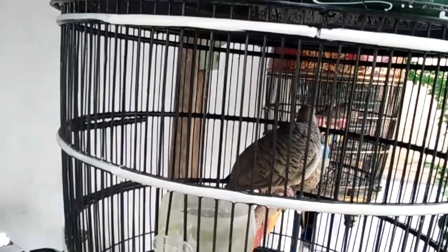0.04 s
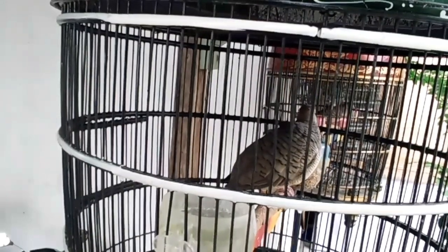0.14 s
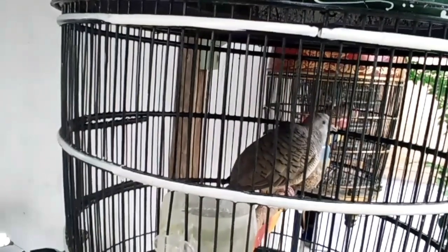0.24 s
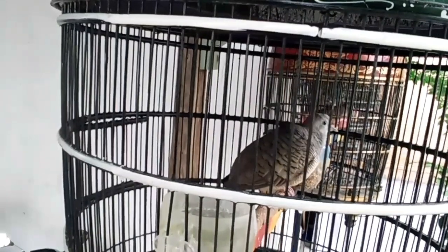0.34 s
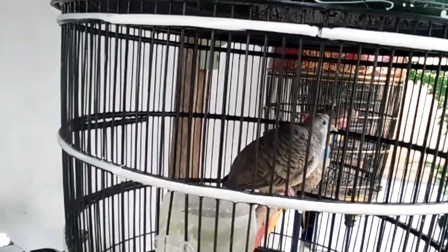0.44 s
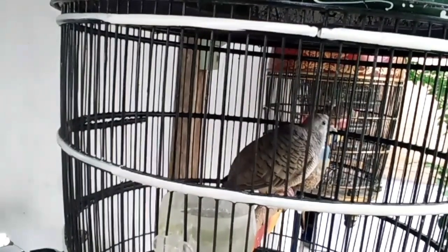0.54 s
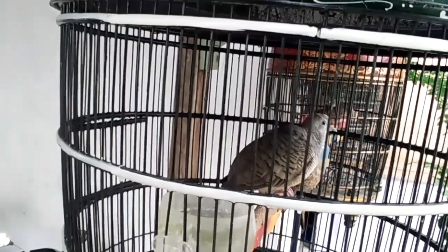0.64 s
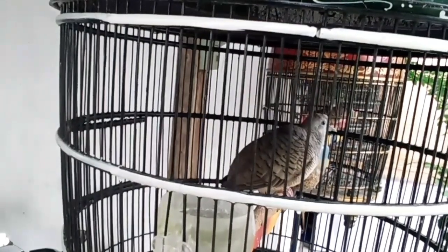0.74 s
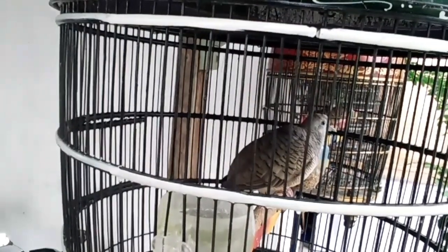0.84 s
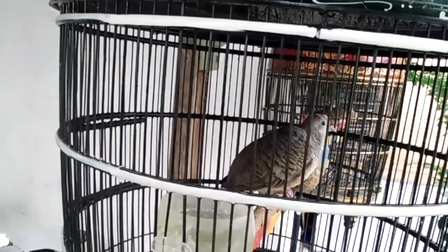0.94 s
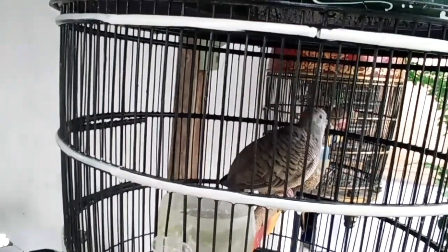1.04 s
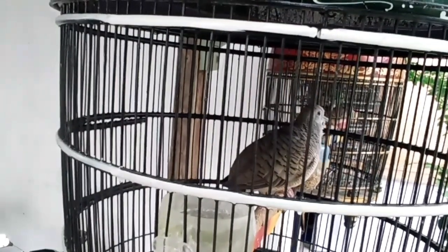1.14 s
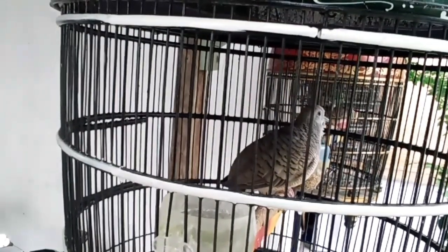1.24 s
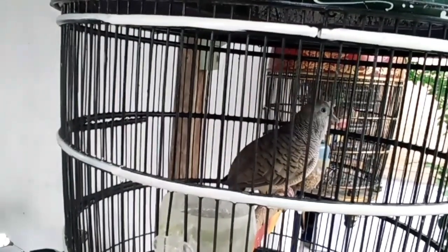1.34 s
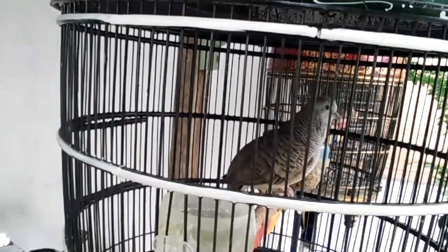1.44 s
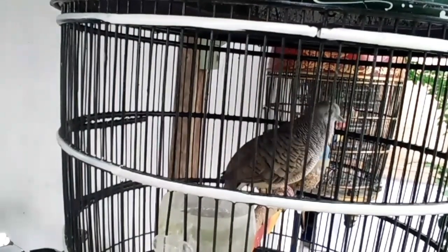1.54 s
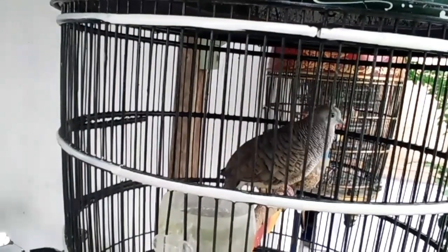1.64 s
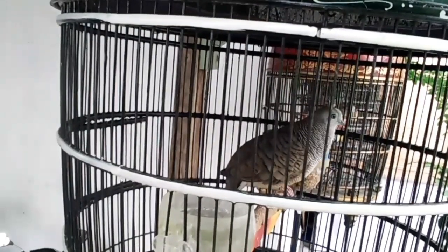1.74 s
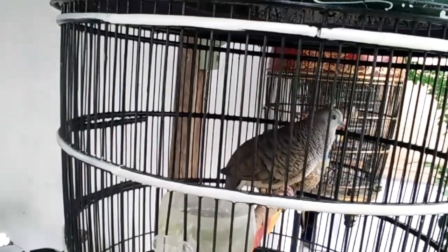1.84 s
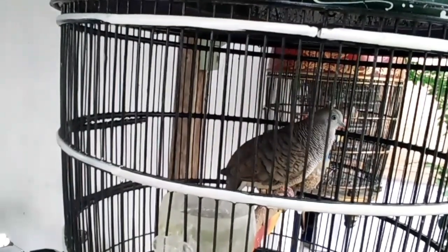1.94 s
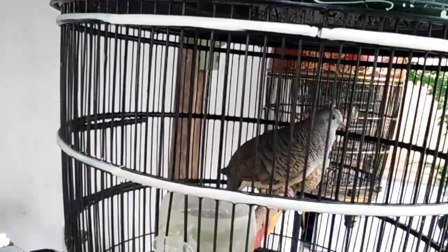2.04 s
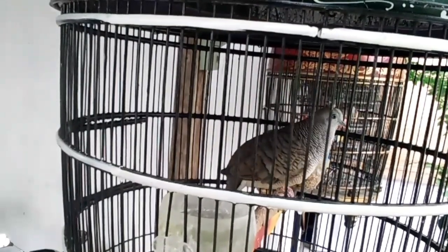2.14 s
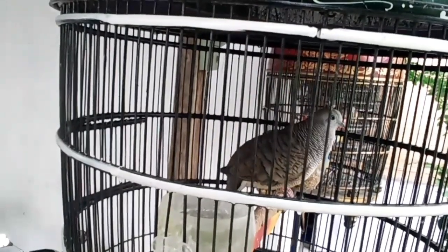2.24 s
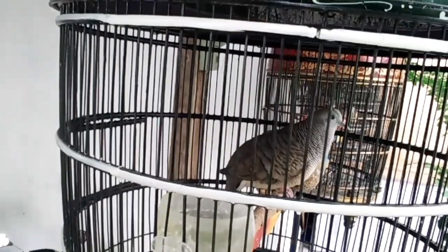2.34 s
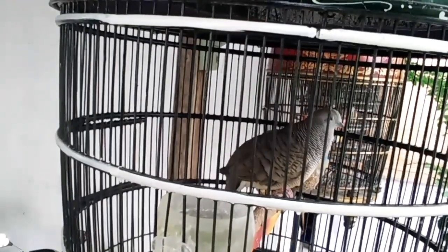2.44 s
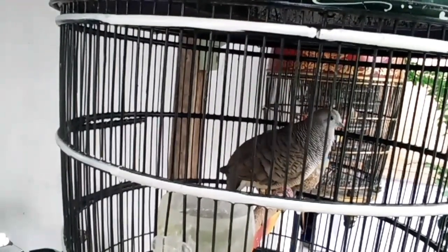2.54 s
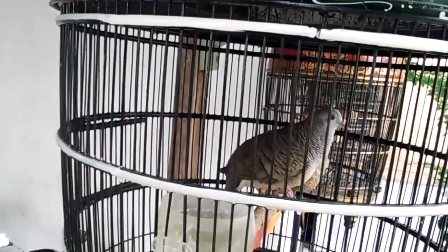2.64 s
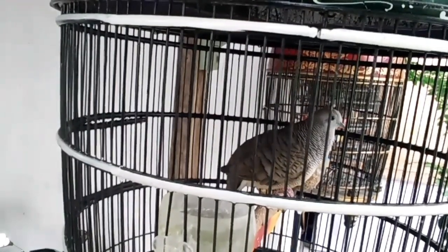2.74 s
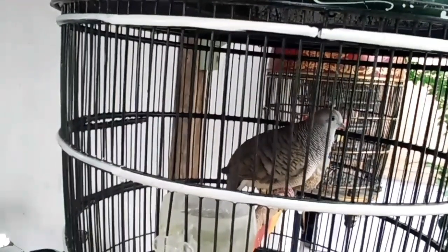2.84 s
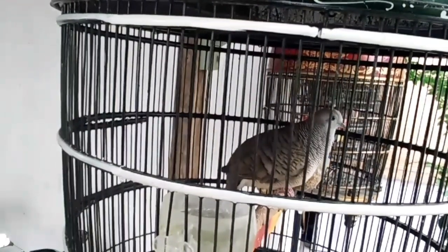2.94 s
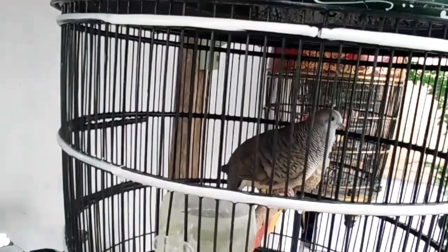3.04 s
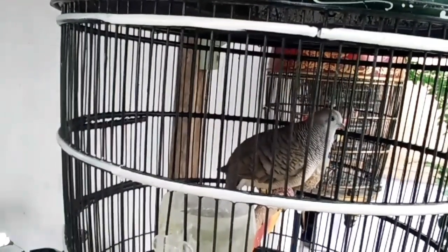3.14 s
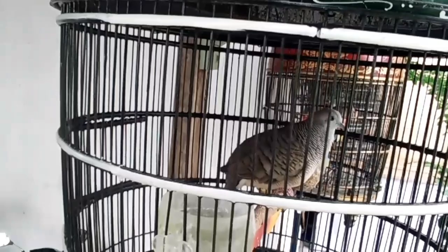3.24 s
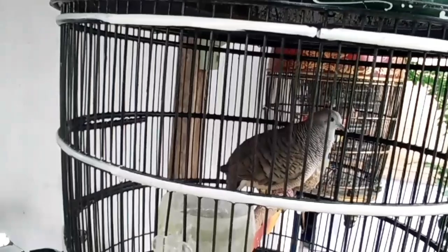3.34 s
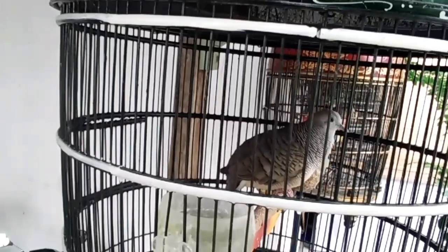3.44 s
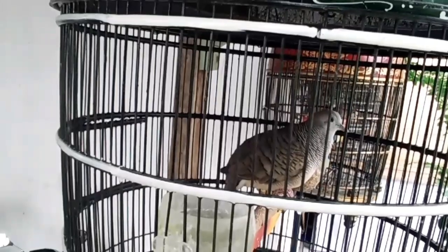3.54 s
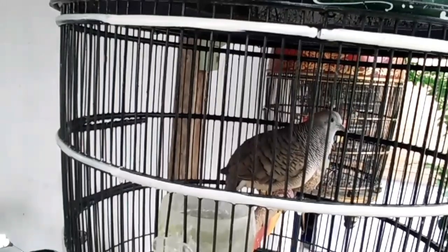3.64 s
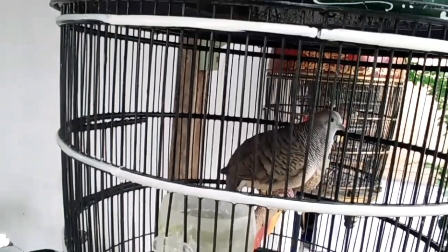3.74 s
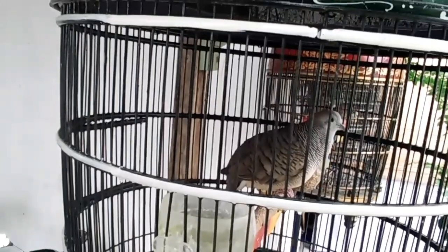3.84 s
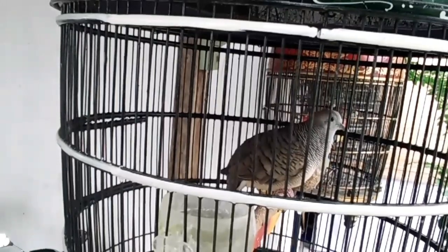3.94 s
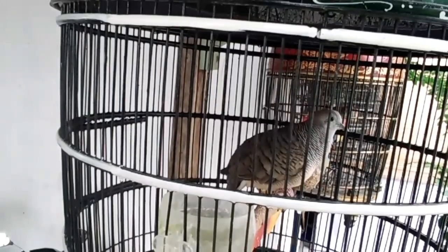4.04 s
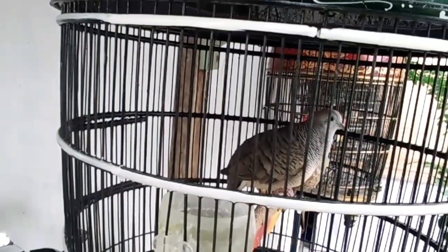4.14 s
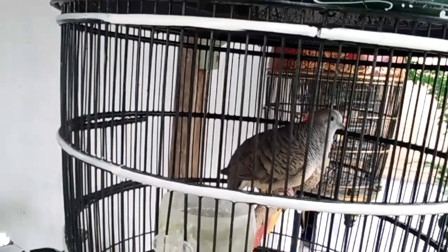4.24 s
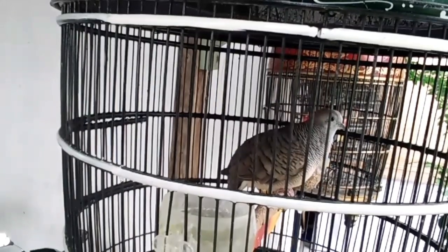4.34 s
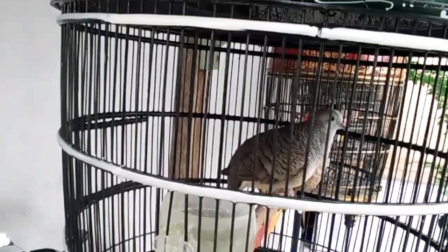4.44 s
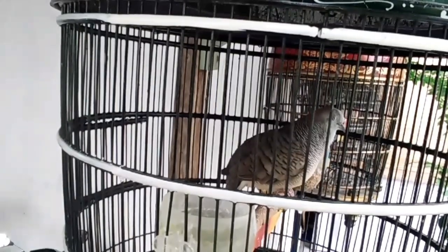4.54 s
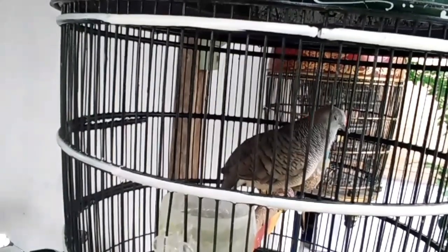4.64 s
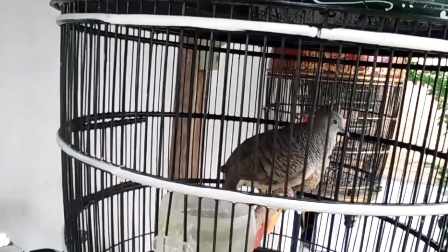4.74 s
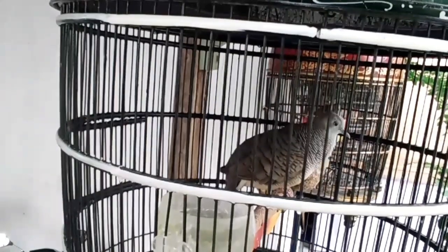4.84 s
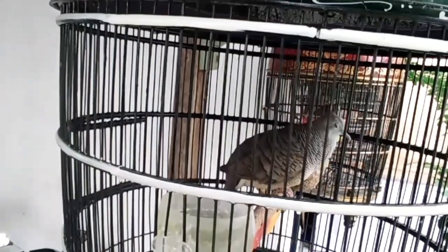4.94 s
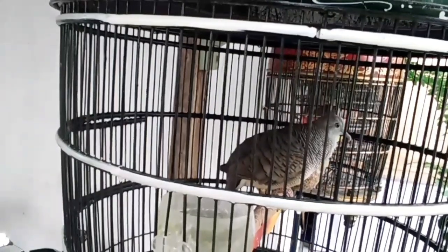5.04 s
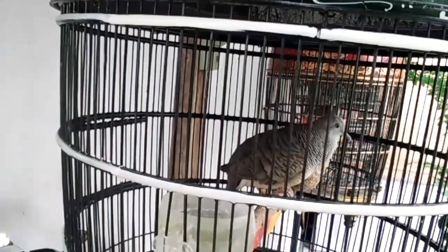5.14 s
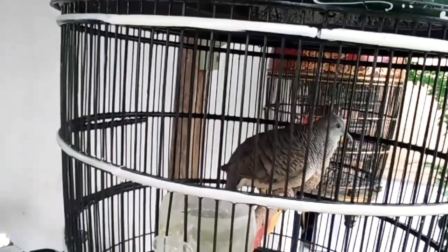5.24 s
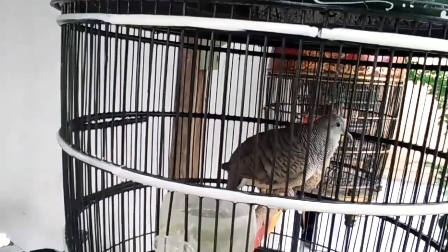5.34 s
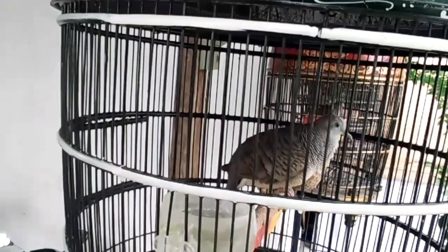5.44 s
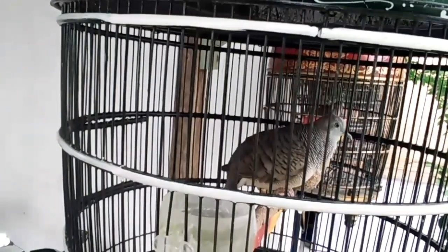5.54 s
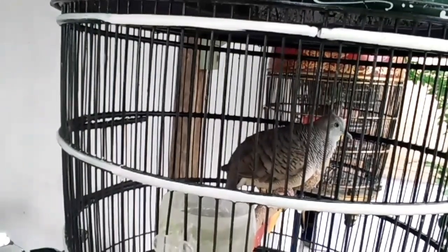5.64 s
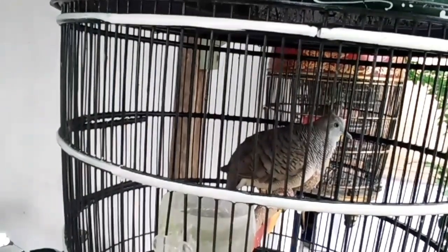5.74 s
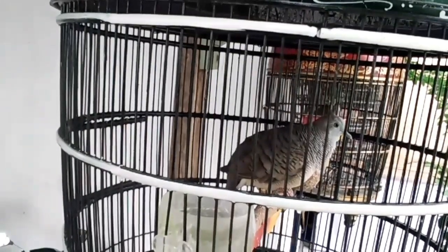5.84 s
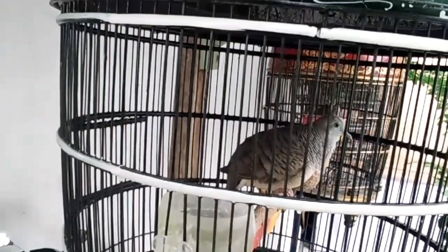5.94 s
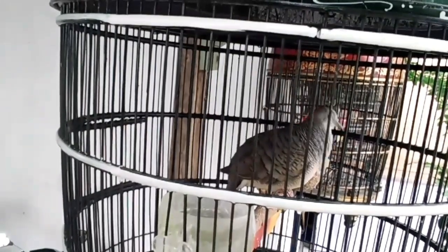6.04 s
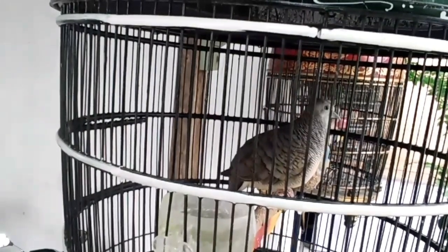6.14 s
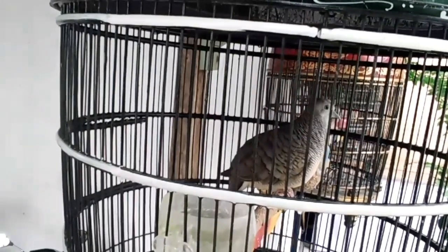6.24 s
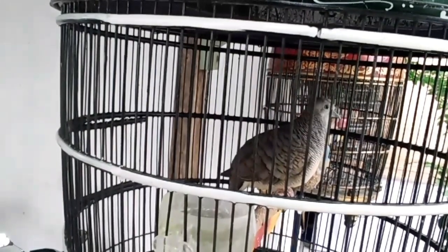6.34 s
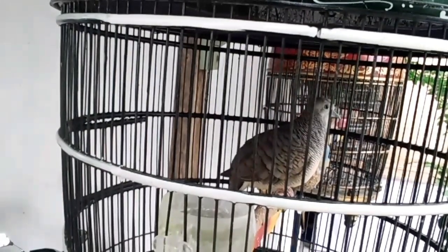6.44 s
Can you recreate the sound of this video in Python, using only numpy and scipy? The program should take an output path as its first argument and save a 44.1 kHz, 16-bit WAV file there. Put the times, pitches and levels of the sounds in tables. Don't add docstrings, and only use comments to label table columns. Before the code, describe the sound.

A quiet walled yard, heard through a close phone-like microphone with faint hum and soft low wind puffs. Around 0.4 and 0.65 s two small, harsh falling bird scolds rasp faintly; from 1.0 to 1.65 s distant doves coo in a blurred, echoing cluster. At 1.73 s the near dove starts, far louder: a round, hollow note, two quick stuttered ones, then steady coos about a tenth of a second long, roughly four per second, until 3.54 s. Each begins with a tiny croak scooping up into a nearly pure mid-high whistle around 1200 Hz, with wall slaps and a short tail. A faint buzz sits near 2.0 s. From 3.2 s a neighbouring dove whistles softly, slightly higher, continuing through the gap. The near dove returns at 4.85 s with a shorter run, ending at 5.53 s. Faint coos and warbles remain, small distant notes rising near 6.4 s.

```python
import sys
import numpy as np
from scipy import signal
from scipy.fft import rfft, irfft, next_fast_len
from scipy.io import wavfile
from scipy.ndimage import uniform_filter1d

SR = 44100
rng = np.random.default_rng(int(sys.argv[2]) if len(sys.argv) > 2 else 0)


def invert_db(level):
    return 10 ** (np.asarray(level, dtype=float) / 20)


def master_out(mix):
    frames = np.transpose(np.atleast_2d(mix))
    ceiling = np.clip(frames, -1, 1)
    pcm = np.round(ceiling * 32767).astype(np.int16)
    wavfile.write(sys.argv[1], SR, pcm)


N = 286870

# (delay [s], level [dB])
WALL_SLAPS = [
    (0.028, 1.2),
    (0.035, -4),
    (.044, -4),
    (.056, -3.5),
    (0.065, -7.5),
]


def dove():
    whistle, spread = whistles()
    scoop, croak = run_ups()
    run_up = scoop + invert_db(-6.5) * croak
    out = whistle + scoop + croak
    diffuse = invert_db(-18.5) * spread + invert_db(-7) * run_up
    early = invert_db(-19.5) * spread + invert_db(-9) * run_up
    add(out, .022, signal.oaconvolve(diffuse, tail(0.74)))
    for delay, db in WALL_SLAPS:
        add(out, delay, invert_db(db) * early[:N - round(delay * SR)])
    return out


# (start [s], end [s], level [dB], top pitch [Hz], fading over the note [dB])
WHISTLES = [(1.733, 1.795, -19, 1210, 0.5), (1.797, 1.806, -29, 1149, 2), (1.814, 1.853, -23.5, 1182, -1.5),
            (1.942, 1.974, -24.5, 1177, -7), (2.06, 2.163, -21.5, 1210, -2), (2.307, 2.418, -22, 1207, -2),
            (2.565, 2.683, -23, 1203, -0.5), (2.837, 2.961, -23.5, 1202, -0.5),
            (3.125, 3.251, -24, 1201, 0.5), (3.414, 3.543, -24, 1194, 0), (4.845, 4.916, -22.5, 1198, 1),
            (4.914, 4.932, -31.5, 1127, 6), (4.928, 4.965, -24, 1175, 1), (5.051, 5.08, -25.5, 1163, -1.5),
            (5.163, 5.282, -24.5, 1179, -0.5), (5.419, 5.529, -25.5, 1187, 1.5)]
BEAK_OPENING = [0.5, -3.5, 4, 0.5, 1.5, 0, 0, -1, -1, -2, 0, -3.5, 5, 0, 3, -3.5]
# (frequency [Hz], level under the first partial [dB])
BEAK_RESPONSE = [(2200, -53), (2450, -55), (3500, -74), (5600, -75), (5750, -55.5), (6050, -60),
                 (6300, -69), (6780, -69), (6960, -53.5), (7250, -54.5), (8200, -69), (10800, -76),
                 (11600, -64.5), (12050, -64.5), (12500, -81), (13500, -81.5)]
# (frequency [Hz], level per Hz [dB])
BREATH_COLOUR = [(600, -27.5), (1300, 2), (2400, -12), (4400, -29.5), (7500, -18.5), (13600, -23.5),
                 (15000, -38.5)]


def whistles():
    out, spread = np.zeros((2, N))
    breath = coloured(BREATH_COLOUR, N)
    last_end = 0
    for (start, end, db, top_hz, fade_db), open_db in zip(WHISTLES, BEAK_OPENING):
        t = np.arange(0, end - start + .0105, 1 / SR)
        share = t / t[-1]
        opening = start - last_end > 1
        brief = end - start < .06
        last_end = end

        sag_hz = 33 if opening else 54 if brief else 78
        arch = np.exp(-t / .0105) + 1.1 * share ** 3.2
        throb = -np.cos(4 * np.pi * (share - .027))
        hz = top_hz + 3 - sag_hz * arch - 45 * np.exp(-t / 0.0067)
        hz += opening * 9 * (throb + 2 * share - 1)
        hz -= 110 * np.exp((t - t[-1]) / .006)

        if opening:
            swell_db = 0.15 + 2 * throb
        else:
            swell_db = 1.73 - 17.5 * (share - .45) ** 2
            if not brief:
                swell_db += 2.1 * np.exp(-((share - .92) / .05) ** 2)
                swell_db -= 1.95 * np.exp(-((share - .76) / .073) ** 2)
        level = invert_db(db + swell_db + fade_db * (share - 0.46)) * edges(t, 0.0075, 0.0105)

        orders = [(1, 0.00037)]
        for k in range(2, 12):
            orders.append((k, read(BEAK_RESPONSE, k * hz) + open_db - 1.5 + 3 * wander(len(t), 0.008)))
        air = invert_db(-49.5) * breath[round(start * SR):][:len(t)]
        note = level * (stack(hz, orders) + air)
        add(out, start - .003, note)
        add(spread, start - .003, note * invert_db(5 * (share - 0.86)))
    return out, spread


# (flip to whistle [s], scoop level [dB], croak start before the flip [s])
RUN_UP_NOTES = [(1.731, -22, 0.044), (1.815, -32, 0.019), (1.944, -25, 0.03), (2.062, -24.5, 0.023),
                (2.309, -25, 0.034), (2.566, -25, 0.028), (2.838, -25, 0.028), (3.127, -25, 0.029),
                (3.415, -25.5, 0.03), (4.846, -23, 0.038), (5.054, -28, 0.028), (5.166, -28, 0.022),
                (5.421, -27, 0.029)]
# (multiple of the pitch [1], level [dB])
CROAK_PARTIALS = [(1.001, -22), (1.599, -11), (2, -2.5), (2.501, -29.5), (3, -38)]


def run_ups():
    scoops, croaks = np.zeros((2, N))
    for flip, scoop_db, early in RUN_UP_NOTES:
        t = np.arange(0, early + 0.0048, 1 / SR)
        growth_s = .0046 * early / .029
        swell = np.exp(np.minimum(t - early + 0.00075, 0) / growth_s) * edges(t, 0.023, 0.01)
        rise = np.clip((t - early + 0.0023) / (2.5 * growth_s), -1.1, .5)
        scoop = invert_db(3.0) * swell * stack(965 + 72 * rise, [(1, 0.5), (2, -41.5)])
        add(scoops, flip - early, invert_db(scoop_db) * scoop)

        share = t / early
        croak_hz = 608 * (.88 + .22 * share + .03 * wander(len(t), .003))
        croak = stack(croak_hz, CROAK_PARTIALS) * invert_db(3 * wander(len(t), .0025))
        hump = np.sin(np.pi * np.clip(share / .95, 0, 1)) ** 1.2
        add(croaks, flip - early, invert_db(scoop_db - 13.5) * croak * hump)
    return scoops, croaks


# (start [s], length [s], level [dB], pitch [Hz], overtone strength [dB])
NEIGHBOUR_NOTES = [(3.179, 0.072, -57.5, 1241, 10), (3.451, 0.13, -52, 1225, -4),
                   (3.653, 0.1, -68, 1291, 9.5), (3.792, 0.11, -56, 1341, -1),
                   (3.975, 0.11, -53.5, 1334, -4), (4.181, 0.094, -51, 1323, 1),
                   (4.397, 0.1, -49.5, 1310, 1), (4.619, 0.095, -50, 1313, 4),
                   (4.872, 0.061, -48, 1328, 3.5), (5.076, 0.055, -47.5, 1328, 2),
                   (5.14, 0.12, -59, 1265, 5.5), (5.314, 0.084, -55.5, 1285, -8.5),
                   (5.39, 0.1, -51.5, 1275, -0.5), (5.523, 0.049, -49, 1268, 2.5),
                   (5.762, 0.072, -58, 1262, 5.5), (6.08, 0.1, -58, 1191, -11.5)]
# (multiple of the pitch [1], level [dB])
NEIGHBOUR_PARTIALS = [(1, 0.35), (2, -29.5), (3, -30.5)]


def neighbour():
    tone, husk = np.zeros((2, N))
    for s, length, db, hz, lift_db in NEIGHBOUR_NOTES:
        t = np.arange(0, length, 1 / SR)
        pitch = hz * (1 - 0.044 * np.exp(-t / 0.015) + 0.012 * wander(len(t), 0.0028))
        level = invert_db(db) * edges(t, 0.022, 0.03)
        husky = [(k, d + lift_db + 5 * wander(len(t), 0.0031)) for k, d in NEIGHBOUR_PARTIALS[1:]]
        husk_pitch = pitch * (.985 + 0.011 * wander(len(t), .004))
        add(tone, s, level * stack(pitch, NEIGHBOUR_PARTIALS[:1]))
        add(husk, s, level * stack(husk_pitch, husky))
    wet = signal.oaconvolve(invert_db(-5.5) * tone + invert_db(-1.5) * husk, tail(1.1))[:N]
    slap = invert_db(-15.5) * tone + invert_db(-14) * husk
    add(wet, .065, slap[:N - round(.065 * SR)])
    return 1.32 * tone + 0.17 * husk + wet


# (start [s], length [s], level [dB], first pitch [Hz], fading [dB])
SCOLD_CALLS = [
    (0.369, 0.1, -59.5, 2550, -2.5),
    (0.654, 0.099, -54, 1890, -11),
]
# (start [s], length [s], level [dB], first pitch [Hz], fading [dB])
BUZZ_CALLS = [
    (1.69, 0.175, -72.5, 2440, 1.5),
    (2.015, 0.205, -63, 2314, -5),
    (2.91, 0.11, -77, 2190, -1.5),
]
# (frequency [Hz], level per Hz [dB])
RASP_COLOUR = [(500, -35), (900, -10), (1550, -9), (2730, -5), (4070, 2.5), (6000, -7.5), (10000, -22),
               (14000, -24), (16000, -59.5)]


def small_birds():
    calls = [c + (.55, 0.89, -2) for c in SCOLD_CALLS] + [c + (.94, 0.71, 7.1) for c in BUZZ_CALLS]
    out = np.zeros(N)
    for s, length, db, first_hz, fade_db, fall, rasp, tilt_db in calls:
        t = np.arange(0, length, 1 / SR)
        pitch = first_hz * fall ** (t / length) * (1 + .035 * wander(len(t), 0.002))
        tones = evened(stack(pitch, [(1, -3.5), (2, -1.5), (3, -9.5), (4, -17.0)]))
        colour = [(hz, d + tilt_db * np.clip(np.log2(hz / 3000), -2, 1.2)) for hz, d in RASP_COLOUR]
        hiss = coloured(colour, len(t)) * invert_db(1.8 * wander(len(t), .003))
        level = invert_db(db + fade_db * t / length) * edges(t, 0.034, 0.047)
        add(out, s, level * ((1 - rasp) * tones + rasp * hiss))
    return out + invert_db(-5) * signal.oaconvolve(out, tail(0.56))[:N]


# (start [s], length [s], level [dB], first pitch [Hz], last pitch [Hz])
FAR_COOS = [(0, 0.047, -57.5, 993, 982), (.07, 0.23, -71, 1018, 1026), (1.02, 0.035, -53, 945, 980),
            (1.05, 0.06, -46.5, 998, 1021), (1.09, 0.064, -50.5, 1282, 1275), (1.1, 0.085, -62.5, 896, 910),
            (1.18, 0.096, -47, 1232, 1135), (1.22, .16, -45.5, 1026, 1051), (1.33, 0.1, -53.5, 1121, 1137),
            (1.41, 0.084, -59.5, 986, 1007), (1.44, 0.098, -48.5, 1116, 1149),
            (1.55, 0.073, -52.5, 1042, 994), (1.56, 0.2, -50.5, 1160, 1186), (3.9, 0.15, -63, 1183, 1150),
            (4.12, 0.13, -63.5, 1097, 1193), (4.33, 0.14, -63.5, 1134, 1159),
            (4.47, 0.14, -68.5, 1155, 1098), (4.57, 0.047, -54, 1010, 1136),
            (4.765, 0.029, -47, 1025, 1170), (5.62, 0.1314, -54, 1095, 984), (5.7, 0.045, -60, 965, 1060),
            (5.8, 0.33, -61, 1137, 1138), (5.98, 0.035, -60.5, 986, 965), (5.995, 0.054, -56, 1133, 1121),
            (6.345, 0.038, -54, 1000, 988), (6.375, 0.044, -43, 1157, 1126), (6.4, 0.066, -55, 1052, 1043),
            (6.43, 0.036, -52, 1151, 1160), (6.478, 0.028, -42, 1202, 1170)]
# (start [s], length [s], level [dB], pitch [Hz])
WARBLES = [(1.069, 0.041, -59, 1870), (1.067, 0.055, -72, 2140), (1.114, 0.14, -65, 1606),
           (1.174, 0.11, -61, 1792), (1.312, 0.23, -67.5, 1380), (1.369, 0.05, -55, 1760),
           (1.398, 0.035, -63.5, 2140), (1.445, .04, -67.5, 2103), (1.375, 0.02, -64, 1880),
           (1.402, 0.056, -56, 1700), (1.48, 0.025, -58.5, 1684), (1.593, 0.15, -57, 1691),
           (1.782, 0.12, -55.5, 1704), (1.948, 0.12, -63.5, 1694), (2.094, 0.22, -66, 1665),
           (2.214, 0.11, -64.5, 2168), (2.9, 0.13, -70, 2200), (3.545, 0.093, -74.5, 1700),
           (3.756, 0.043, -63.5, 1780), (3.197, 0.093, -68, 1727), (5.547, 0.046, -61.5, 1856),
           (6.216, 0.18, -70, 1840), (6.302, 0.04, -64.5, 1897), (6.341, 0.065, -67, 2010),
           (6.45, .025, -67, 2010), (6.363, 0.082, -75, 2200), (6.374, 0.075, -67, 1610)]
# (start [s], length [s], level [dB], pitch [Hz])
PIGEON_HOOTS = [(0.909, 0.12, -73.5, 638), (0.995, .13, -78, 376), (1.556, 0.16, -75, 396),
                (2.166, .04, -61, 771), (2.763, 0.11, -76, 362.5), (2.892, 0.044, -69, 446),
                (3.547, .07, -74.5, 636), (4.248, 0.045, -71, 450), (4.76, 0.08, -74.5, 427.4),
                (5.61, 0.029, -68.5, 413), (5.69, 0.044, -64.5, 703), (5.839, 0.07, -68, 302.3),
                (6.077, .1, -79.5, 638)]
# (start [s], length [s], level [dB], first pitch [Hz], last pitch
# [Hz])
THIN_PEEPS = [
    (1.575, .04, -79, 6750, 6400),
    (1.605, .025, -84, 6300, 5500),
    (1.618, .065, -76, 5400, 4950),
    (1.675, .055, -76, 4950, 3900),
    (1.63, .07, -84, 6620, 6500),
    (.88, .17, -87, 2680, 2780),
    (.74, .07, -82, 2330, 2310),
    (.705, .05, -68, 1160, 1150),
]
# (start [s], length [s], level [dB], first [Hz], last [Hz])
VOICED_STROKES = [(.378, .03, -71, 5850, 5700), (.388, .03, -66, 3600, 3500), (.398, .04, -65, 2600, 1750),
                  (.41, .04, -68, 4300, 3700), (.415, .03, -71, 2750, 2500), (.665, .03, -70, 5600, 5600),
                  (.668, .025, -67, 3000, 4300), (.685, .035, -64, 5600, 4000),
                  (.68, .035, -64, 4250, 4100), (.68, .035, -66, 2850, 2750), (.688, .035, -67, 2100, 1300),
                  (1.72, .06, -78, 4150, 3950), (1.7, .06, -78, 5100, 4900), (1.745, .08, -76, 4700, 4300),
                  (1.72, .11, -79, 8600, 8500), (1.72, .1, -83, 9300, 9000), (2.03, .035, -73, 5300, 5700),
                  (2.04, .07, -71, 4850, 4500), (2.07, .07, -71, 4250, 4400), (2.04, .07, -74, 3650, 3300),
                  (2.12, .07, -78, 4750, 4400), (2.13, .06, -81, 3600, 3600)]


def far_birds():
    out = distant(FAR_COOS, .42, -3.6, -12.5)
    out += distant([c + (.95 * c[-1],) for c in WARBLES], .28, -5.5, -13)
    out += distant([c + c[-1:] for c in PIGEON_HOOTS], 0.43, -2.5)
    out += distant(THIN_PEEPS, .22, 3, -3)
    return out + invert_db(1.5) * distant(VOICED_STROKES, .24, -4, -1.5)


def distant(rows, rough, wet_db, dry_db=-13.5):
    out = np.zeros(N)
    for s, length, db, first_hz, last_hz in rows:
        t = np.arange(0, length, 1 / SR)
        glide = first_hz + (last_hz - first_hz) * t / length
        pitch = glide * (1 + 0.099 * rough * wander(len(t), 0.0052))
        flutter = invert_db(2 * rough * wander(len(t), 0.018))
        add(out, s, invert_db(db) * flutter * edges(t, 0.0057, .015) * stack(pitch, [(1, 0.0039)]))
    return invert_db(dry_db) * out + invert_db(wet_db) * signal.fftconvolve(out, tail(0.71))[:N]


# (peak [s], peak level [dB], build-up [dB per s])
WIND_GUSTS = [(.27, -64, 290), (2.41, -66.5, 14), (2.95, -70, 20.5), (3.22, -68.5, 57), (3.55, -65.5, 57),
              (3.87, -65, 185.5), (4.11, -65, 67), (4.71, -62, 55), (4.82, -56, 296), (4.95, -63, 16),
              (5.12, -68, 14.5), (5.5, -66.5, 11.5), (5.68, -69, 23), (5.87, -63, 238), (6.1, -70, 14),
              (6.46, -69.5, 195.5)]
# (start [s], end [s], level [dB])
MURMUR_BOUTS = [
    (0, 0.01, -64),
    (1.213, 1.708, -65),
    (1.937, 2.185, -58.5),
    (2.4, 2.807, -61),
    (2.97, 3.201, -57.5),
    (3.4, 3.6, -66.5),
    (4.202, 4.5, -72),
    (4.98, 5.101, -55.5),
    (5.2, 5.4, -59),
    (5.6, 5.85, -65),
]
# (frequency [Hz], level per Hz [dB])
MURMUR_COLOUR = [(350, -26.5), (600, -11.5), (900, 3.5), (1100, 10), (1400, -12.5), (1900, -17), (2400, -20),
                 (3200, -35), (5000, -65.5)]
# (frequency [Hz], level per Hz [dB])
STREET_COLOUR = [(20, -42.5), (50, -6.5), (130, -1), (230, -13), (300, 0), (370, -12.5), (700, -9),
                 (1000, -17), (1500, -14), (2600, -25), (5800, -31.5), (12000, -32), (14200, -34.5),
                 (15500, -62.5)]


def street():
    t = np.arange(0, N / SR + .01, .005)
    peak_s, peak_db, build_db = np.transpose(WIND_GUSTS)
    wind_db = np.maximum(bouts(t, peak_s, peak_s, peak_db, build_db, 130), -81)
    murmur_db = bouts(t, *np.transpose(MURMUR_BOUTS), 48.5, 31)
    at = np.arange(N) / SR
    wind_db = np.interp(at, t, wind_db)
    murmur_db = np.interp(at, t, murmur_db)
    lumps, flicker = slow_noise(N, 700), slow_noise(N, 900)
    rumble = [(25, -32.5), (45, -7.0), (60, 0.4), (130, -5.5), (220, -8.0), (400, -30.0), (900, -61.0)]
    gusts = invert_db(wind_db - 7.0 + 5.0 * lumps) * coloured(rumble, N)
    murmur = invert_db(murmur_db - 3.5 + 3.8 * flicker) * coloured(MURMUR_COLOUR, N)
    return invert_db(-73.5) * coloured(STREET_COLOUR, N) + murmur + gusts


def bouts(t, start, end, db, rise_db, fall_db):
    t = t[:, None]
    building = rise_db * np.maximum(start - t, 0)
    dying = fall_db * np.maximum(t - end, 0)
    return (db - building - dying).max(axis=1)


# (frequency [Hz], time to fall by 60 dB [s])
YARD_DECAY = [(300, 0.7), (1000, 0.49), (3000, 0.2), (6000, 0.38), (9000, 0.3)]


def tail(stretch):
    taps = np.zeros(SR // 2)
    at = np.arange(300, SR // 2 - 20, 20)
    taps[at + rng.integers(0, 20, len(at))] = rng.choice([-1., 1.], len(at))
    hz, t, z = signal.stft(taps, SR, nperseg=256)
    decay_s = stretch * read(YARD_DECAY, hz)[:, None]
    out = signal.istft(z * invert_db(-60 * t / decay_s), SR, nperseg=256)[1]
    return out / np.linalg.norm(out)


def stack(hz, orders):
    phase = 2 * np.pi * (np.cumsum(hz) / SR + rng.random())
    return np.sqrt(2) * sum(invert_db(db) * np.sin(k * phase) for k, db in orders)


def coloured(points, size):
    hz, db = np.transpose(points)
    long = next_fast_len(size)
    bins = np.log(np.fft.rfftfreq(long, 1 / SR) + 1)
    gain = invert_db(np.interp(bins, np.log(hz), db))
    return evened(irfft(rfft(rng.standard_normal(long)) * gain, long))[:size]


def slow_noise(size, width):
    return evened(uniform_filter1d(uniform_filter1d(rng.standard_normal(size), width), width))


def wander(size, seconds):
    return slow_noise(SR // 3, max(int(seconds * SR), 2))[:size]


def edges(t, rise, fall):
    ramp = np.minimum(t / rise, (t[-1] - t) / fall)
    return np.sin(np.pi / 2 * np.clip(ramp, 0, 1)) ** 2


def evened(x):
    return x / np.sqrt(np.mean(x ** 2) + 1e-20)


def read(points, at):
    return np.interp(at, *np.transpose(points))


def add(mix, s, sound):
    part = mix[max(round(s * SR), 0):][:len(sound)]
    part += sound[:len(part)]


def scene():
    return (dove() + neighbour() + small_birds() + far_birds() + street())[None]


def low_pass(x):
    return signal.sosfilt(signal.butter(12, 15570, fs=SR, output="sos"), x)


def record(dry):
    limit = signal.firwin(255, 14300, fs=SR)[None]
    mix = signal.oaconvolve(dry, limit, "same")
    return low_pass(mix)


dry = scene()
out = record(dry)
master_out(out)
```